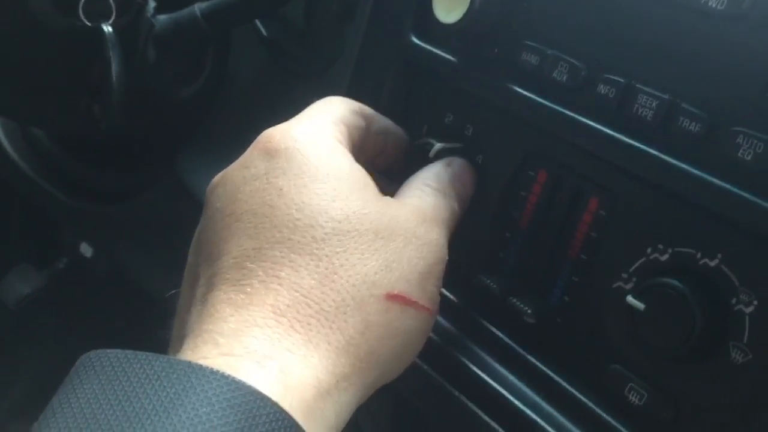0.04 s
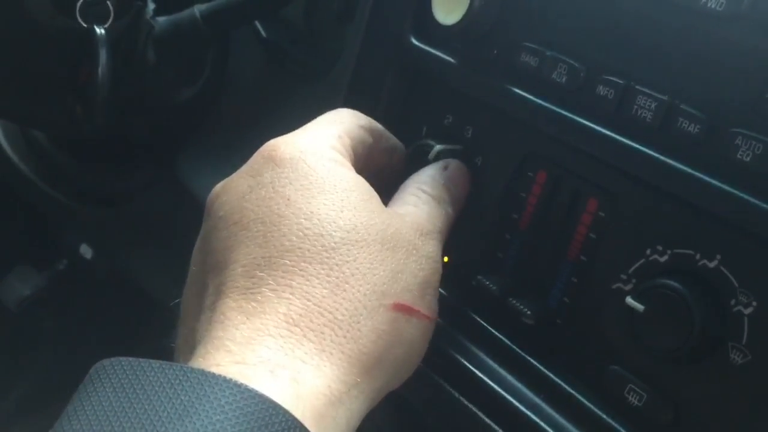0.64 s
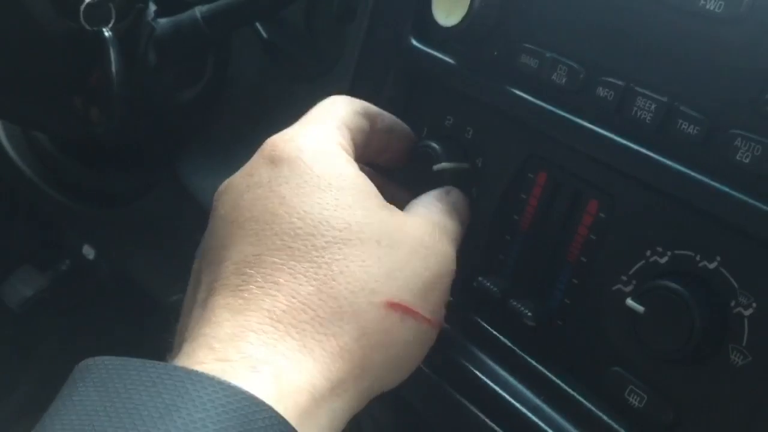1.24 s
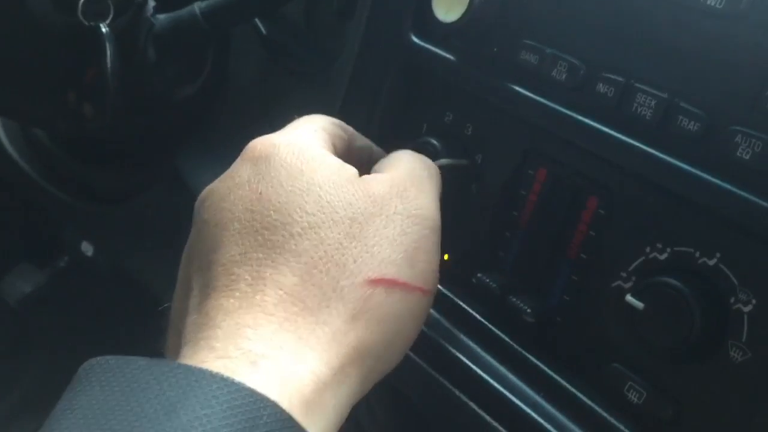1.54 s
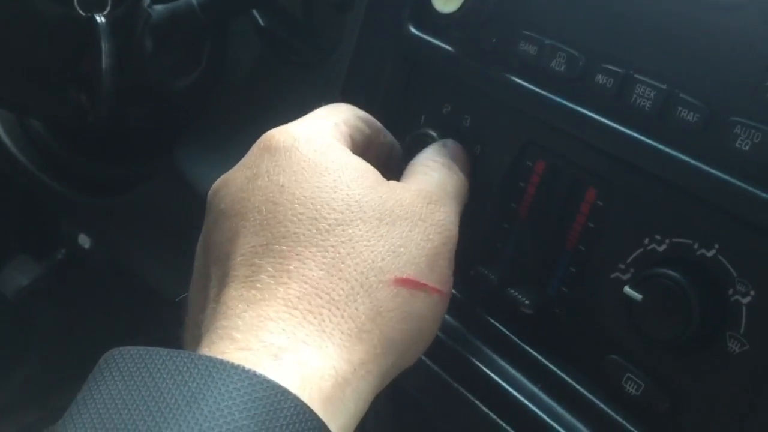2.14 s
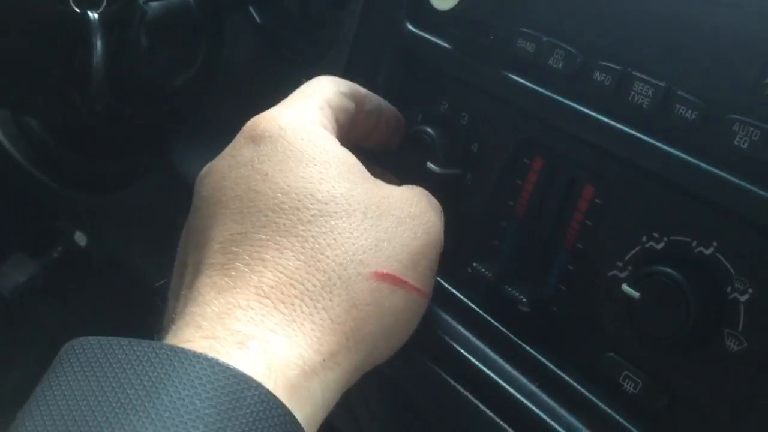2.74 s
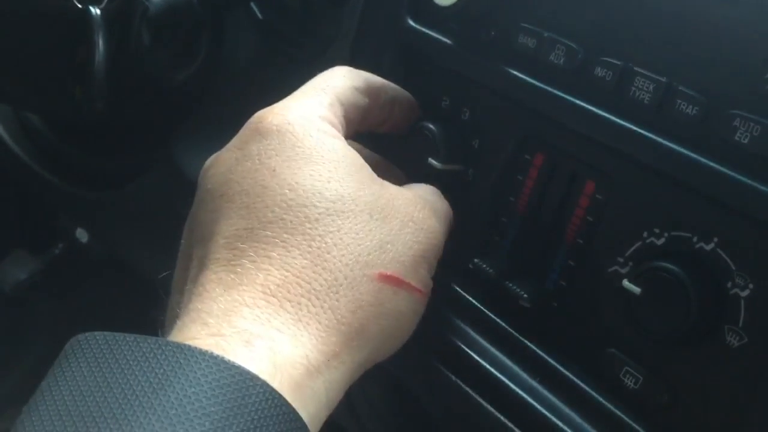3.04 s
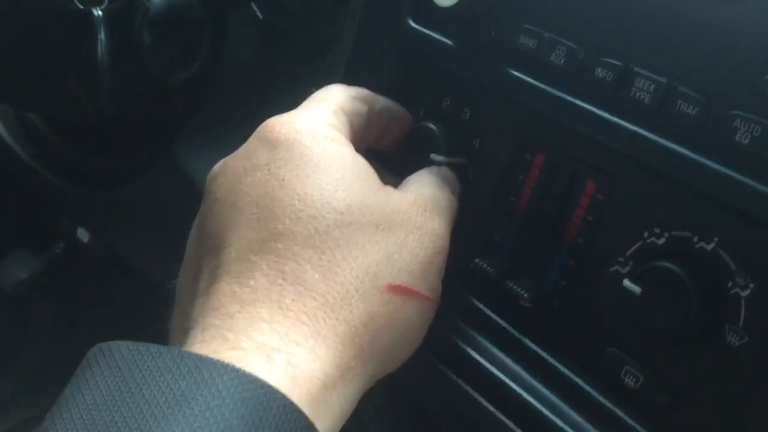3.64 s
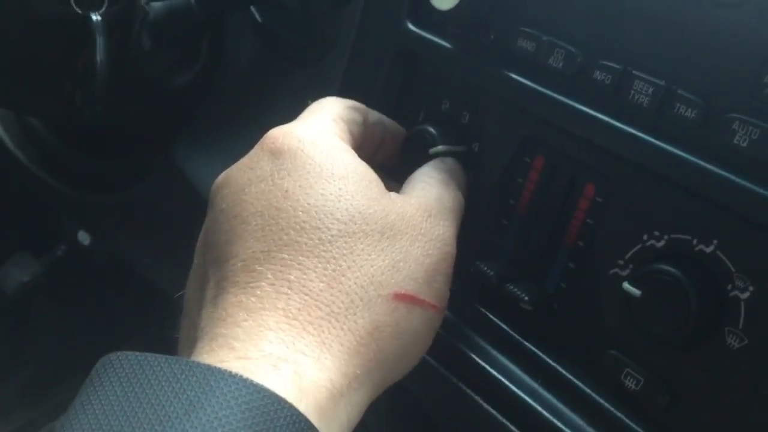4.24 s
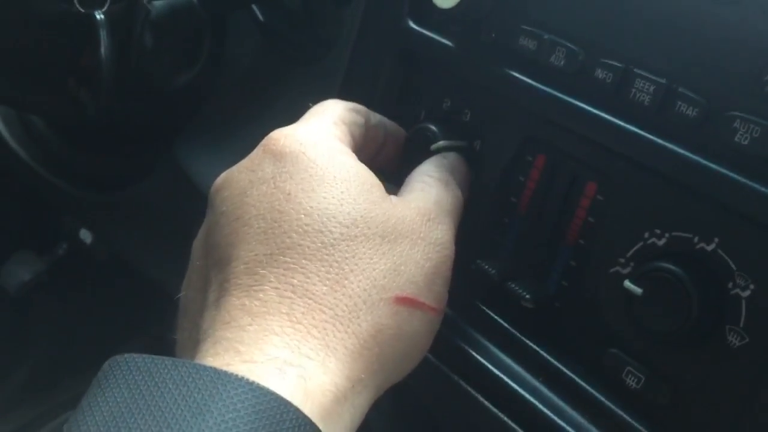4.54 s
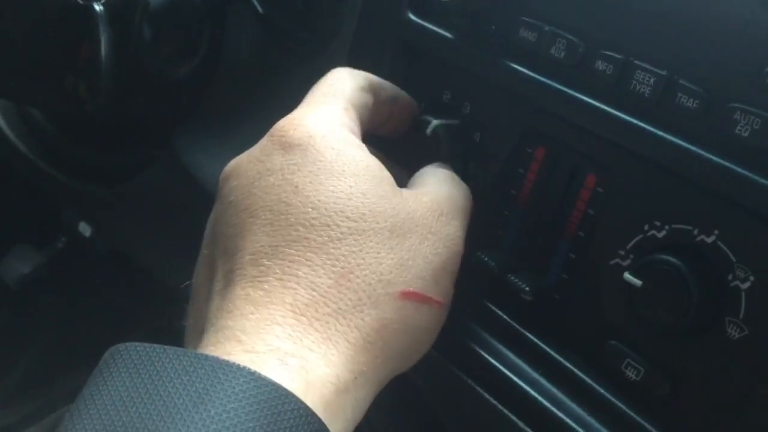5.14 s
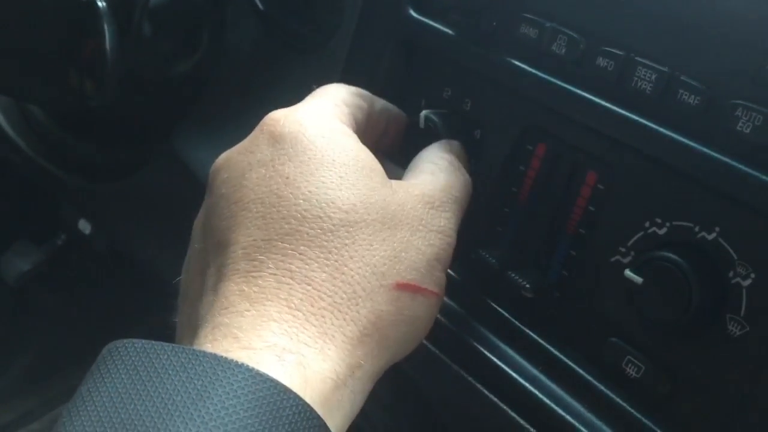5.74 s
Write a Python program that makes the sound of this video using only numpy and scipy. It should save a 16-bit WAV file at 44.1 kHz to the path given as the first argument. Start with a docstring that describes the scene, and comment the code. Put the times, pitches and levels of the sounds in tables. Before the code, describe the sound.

A car heater fan blows, rising to full and dropping back down as a plastic knob clicks through its settings.

```python
"""A car's heater blower, on one microphone at the driver's seat, the dashboard within arm's reach.
A hand clicks the fan knob up to full and back down to its lowest position; the detents snap in plastic.
Each position sets a speed that the wheel runs up or coasts down to. That speed drives the rumble in the
ducts, the hiss at the vents and the motor's hum; the motor whoops while it pulls hard.
The cabin is small and dead, with a low drone under everything."""
import sys
import numpy as np
from scipy import signal
from scipy.fft import rfft, irfft
from scipy.io import wavfile
from scipy.ndimage import uniform_filter1d

SR = 44100
rng = np.random.default_rng(int(sys.argv[2]) if len(sys.argv) > 2 else 0)


def put_to_file(sound):
    """Save the sound as 16-bit audio at rate SR, in the file named by the first command-line argument."""
    columns = np.atleast_2d(sound).T  # one column per channel
    safe = np.clip(columns, -1, 1)
    whole_steps = np.round(safe * 32767)
    wavfile.write(sys.argv[1], SR, whole_steps.astype(np.int16))


N = 259749

FULL_HZ = 50.2  # the shaft rate that counts as speed 1
# how the blower housing passes the motor's sound: (frequency [Hz], gain [dB])
HOUSING_GAIN = [(200, -18), (260, -13), (293, -6), (325, -12), (355, -5), (380, 0), (395, 0), (425, -3),
                (452, 0), (474, -3), (502, -2), (545, -8), (597, -6), (700, -26)]
# the knob drops into a position; on the way up it overshoots to full and slips back:
# (time [s], position, tick level [dB], snap level [dB], snap's treble lift [dB],
#  knock level [dB], knock range [Hz], thump level [dB])
KNOB_MOVES = [(1.112, 4, -42, -36.5, 9, -47, 2220, -44.5), (1.262, 3, -60, -47.5, 9, -59, 1810, -49),
              (2.3217, 4, -47, -34, 1.5, -30.5, 1620, -32.5), (3.767, 3, -55, -36, 6.5, -35.5, 1980, -37.5),
              (4.7434, 2, -59, -38, 9, -40, 1260, -38.5), (5.6444, 1, -56, -34.5, 12, -47.5, 901, -42)]


def undb(db):
    """Decibels to gain."""
    return 10 ** (np.asarray(db) / 20)


def response(points, hz):
    """Gain at hz of a spectrum of (frequency [Hz], level [dB]) points."""
    at, db = np.transpose(points)
    return undb(np.interp(np.log(hz + 1e-9), np.log(at), db))


def bins(size):
    """Frequencies of the spectrum of a sound of this length."""
    return np.arange(size // 2 + 1) * SR / size


def peak(f, hz, width):
    """Squared magnitude of one resonance, 1 at its centre."""
    return abs(1j * f * width / (hz ** 2 - f ** 2 + 1j * f * width)) ** 2


def noise(gain):
    """Noise of rms 1, its spectrum shaped by gain."""
    x = irfft(rfft(rng.standard_normal(N)) * gain, N)
    return x / np.sqrt(np.mean(x ** 2))


def walk(rate):
    """Random levels held 1 / rate s and smoothed twice; spread near 1."""
    hold = max(int(SR / rate), 1)
    steps = np.repeat(rng.standard_normal(N // hold + 1), hold)
    return 1.12 * uniform_filter1d(uniform_filter1d(steps, hold), hold)[:N]


def trail(x, lag):
    """Follow a control with a time constant of lag s."""
    keep = np.exp(-1 / (lag * SR))
    return x[0] + signal.lfilter([1 - keep], [1, -keep], x - x[0])


def split(x, hz):
    """The parts of a sound below and above hz."""
    high = irfft(rfft(x) / (1 + (hz / (bins(N) + 1)) ** 3), N)
    return x - high, high


def causal(gain):
    """The response with this gain that rings only after the blow."""
    cepstrum = irfft(np.log(gain + 1e-9))
    half = len(cepstrum) // 2
    cepstrum[1:half] *= 2
    cepstrum[half + 1:] = 0
    return np.exp(rfft(cepstrum))


def wheel():
    """Shaft rate [Hz] easing to each setting, and pull: the share of speed lacking, negative coasting."""
    # where the shaft settles: {knob position: shaft rate [Hz]}
    settled_hz = {1: 25.6, 2: 32.8, 3: 39.15, 4: 50.15}
    # easing time: straight off the battery in the top position, through a resistor in the others
    direct_turns, resistor_turns = 4.7, 8.2
    start_hz, start_position = 27.9, 2
    t = np.arange(N) / SR
    hz, goal = np.full(N, start_hz), np.zeros(N)
    for start, position, *_ in [(0.00076, start_position)] + list(KNOB_MOVES):
        i, goal_hz = int(start * SR), settled_hz[position]
        lag = (direct_turns if position == max(settled_hz) else resistor_turns) / goal_hz
        hz[i:] = goal_hz + (hz[i] - goal_hz) * np.exp(-t[:N - i] / lag)
        goal[i:] = goal_hz
    return hz, (goal - hz) / FULL_HZ


def duct_rumble(speed):
    """Turbulence behind the dashboard grows as a power of the speed and sounds the ducts' resonances."""
    # rumble at full speed: (frequency [Hz], relative level [dB])
    spectrum = [(22, -25), (38, -19), (50, -12.5), (68, 3), (95, -3.5), (118, 2.5), (155, -7), (195, -6.5),
                (230, -15.5), (275, -15.5), (320, -15.5), (400, -16.5), (520, -21.5), (610, -22),
                (690, -28), (800, -29), (1150, -54), (1800, -99)]
    # duct resonances: (frequency [Hz], width [Hz], relative level [dB])
    modes = [(568, 63, 11), (867, 54, 7.5), (974, 143, 8), (1085, 100, 6), (1339, 51, 0), (1764, 60, -7),
             (2000, 60, -2)]
    f = bins(N)
    # big eddies take a moment to build and to die; smaller ones follow the wheel
    big, small = split(noise(response(spectrum, f)), hz=200)
    eddies = big * trail(speed, lag=0.16) ** 2.41 + small * speed ** 2.45
    rumble = eddies * undb(-29 + .5 * walk(5.39))
    mode_power = sum((undb(db) * peak(f, hz, width)) ** 2 for hz, width, db in modes)
    return rumble + noise(np.sqrt(mode_power)) * speed ** 3.1 * undb(-45.5 + 1.2 * walk(21))


def vent_hiss(speed, pull):
    """Air hisses through the slats; small eddies need fast air, so it brightens as it swells."""
    # hiss at full speed: (frequency [Hz], relative level [dB])
    spectrum = [(710, -40), (1200, -1.5), (1700, 3), (2380, -2.5), (3000, -2), (3360, -4.5), (3950, -2.5),
                (4600, -6), (5020, -12), (6230, -10.5), (7660, -18.7), (9500, -21), (10400, -33.5),
                (11600, -39), (14800, -29.5), (16000, -49)]
    # the slats colour the hiss: (frequency [Hz], width [Hz], lift [dB])
    slat_peaks = [(2280, 70, 1.5), (2680, 70, 2), (3170, 100, 4.5), (3450, 80, 3), (3705, 80, 4.5),
                  (4460, 120, 2), (4770, 90, 2.5)]
    f = bins(N)
    slats = undb(sum(db * peak(f, hz, width) for hz, width, db in slat_peaks))
    coarse, fine = split(noise(response(spectrum, f) * slats), hz=2800)
    push = speed + 0.11 * np.maximum(pull, 0)  # answers the motor's pull at once
    hiss = coarse * push ** 4.17 + fine * (push + 0.062 * np.minimum(pull, 0)) ** 5.14
    return hiss * undb(-46.5 + walk(12))


def shaft_tone(multiple, hz, angle):
    """One multiple of the shaft rate, heard through the housing; faster air makes it flutter more."""
    flutter = undb(2.6 * hz / FULL_HZ * walk(18) - .65)
    tone = np.sqrt(2) * np.sin(multiple * angle + rng.uniform(0, 2 * np.pi))
    return flutter * response(HOUSING_GAIN, multiple * hz) * tone


def motor_hum(hz, angle, pull):
    """The wheel's harmonics and the whine of the armature slots sweep through the housing's resonances."""
    # wheel hum: (multiple of the shaft rate, full-speed level before the housing [dB], power of speed)
    harmonics = [(7, -50, 1), (8, -45.8, 2.1), (9, -45, 2.6), (10, -46.6, 1.9), (11, -55, 2), (13, -56, 1),
                 (15, -41.5, 4)]
    # swell of the armature's whine: (time [s], relative level [dB])
    whine_swell = [(0, -4), (.25, 0), (1.1, 0), (1.35, -6), (1.7, -2), (2.3, -3), (3.8, -1.5), (4.4, .5),
                   (4.9, 0), (5.1, -4), (5.3, -1), (5.72, .5), (5.88, -9)]
    slots, whine_db = 12, -46.3
    speed = hz / FULL_HZ
    hum = sum(shaft_tone(k, hz, angle) * undb(db) * speed ** power for k, db, power in harmonics)
    swell_db = np.interp(np.arange(N) / SR, *np.transpose(whine_swell))
    whine = shaft_tone(slots, hz, angle) * undb(whine_db + swell_db)
    # coasting down from a high speed, the motor draws little current and its tones sink
    load = undb(90 * trail(np.minimum(pull, 0) * speed ** 4, lag=.02))
    return load * (hum + whine)


def motor_surge(hz, angle, pull):
    """A surge of current makes the motor whoop upwards and growl, and its brushes hiss."""
    # torque ripple: (multiple of the shaft rate, level at pull 1 before the housing [dB])
    ripple_orders = [(11, -4), (14, -8)]
    f, current = bins(N), np.maximum(pull, 0)
    growl = noise(peak(f, hz=530, width=230) * np.sqrt(response(HOUSING_GAIN, f))) * undb(-20.5)
    brushes = noise(peak(f, hz=4300, width=4300)) * undb(-40)
    ripple = sum(shaft_tone(k, hz, angle) * undb(db) for k, db in ripple_orders)
    whoop = trail(current, lag=.065) ** 2 * ripple
    return whoop + trail(current, lag=.036) ** 2 * (growl + brushes)


def cabin_drone():
    """A low drone, as of an idling engine, that stays whatever the fan does."""
    return noise(peak(bins(N), hz=81, width=38)) * undb(-43)


def knob_contacts():
    """The spring ticks over the ridge and snaps into the notch; the knob knocks home; the panel thumps."""
    # ticks and rebounds of the knob's play under the fingers; all contacts share these columns:
    # (time [s], level [dB], favoured range [Hz], its lift [dB], its width [octaves], fade [s])
    rattles = [(1.105, -48, 14000, 19, .8, 0.0013), (1.127, -43, 3500, 2, .8, 0.0023),
               (1.251, -63, 13000, 16, .8, .0018), (1.2505, -48.5, 5740, 25, 0.088, 0.00091),
               (2.28, -52, 3800, 9, .8, .0018), (2.2885, -43, 7000, 5, 0.12, 0.00087),
               (2.2895, -52, 3300, 17, .2, .0018), (2.3215, -33, 3600, 10, 0.14, 0.0015),
               (2.3218, -37, 9300, 14, .3, 0.00076), (4.7525, -45, 1920, 19, .5, 0.0012),
               (4.758, -54, 2400, 13, .8, 0.0017), (4.7725, -55, 2508, 14, .8, .0015),
               (5.6405, -46.5, 6410, 14, .15, 0.0021), (5.6457, -48.5, 9000, 15, .3, 0.00045),
               (5.6515, -47, 2900, 11, 0.92, 0.0015), (5.749, -61.5, 7000, 3, .8, 0.0015)]
    contacts = []
    for start, _, tick_db, snap_db, lift_db, knock_db, knock_hz, thump_db in KNOB_MOVES:
        tick = (start - .0055, tick_db, 7400, 12, .8, .0018)
        snap = (start, snap_db, 3700, lift_db, .8, .002)
        knock = (start + .00099, knock_db, knock_hz, 18, .35, .0028)
        thump = (start + .005, thump_db, 650, 10.5, .8, .0061)
        contacts += [tick, snap, knock, thump]
    return contacts + list(rattles)


def knob_clicks():
    """Each contact is a brief chatter that cracks and rings the plastic and scatters off the dashboard."""
    # modes of knob and panel, damped by the fingers: (frequency [Hz], width [Hz], relative level [dB])
    modes = [(490, 90, 18), (610, 90, 8.5), (830, 90, 7), (985, 110, 9.5), (1160, 110, 7.5),
             (1610, 70, 8.5), (1735, 90, 10), (1880, 80, 9), (2190, 80, 12), (2360, 70, 5.5), (2530, 70, 5),
             (2690, 70, 5), (3000, 70, 10.5), (3150, 150, 14), (3380, 170, 11.5), (3610, 150, 11.5),
             (4100, 260, 4), (4430, 240, 9.5), (5820, 220, 1.5), (6520, 300, 1.5), (8060, 160, -.5),
             (9000, 160, -1), (9750, 200, 0), (12600, 600, -12), (14750, 500, -7)]
    # the crack of plastic on plastic: (frequency [Hz], relative level [dB])
    crack = [(150, -23), (520, 5), (850, 8.5), (1400, 4.5), (2050, 0.5), (2800, 6.5), (3900, -2.5),
             (4650, 2), (4920, -8), (5200, 0.5), (5900, -3.5), (6900, -2.5), (7800, -4.5), (9700, -10),
             (11400, -24), (13000, -16), (15500, -14)]
    rise_s, scatter_db, scatter_fade_s = .0008, -23.5, .0095
    size = 8192
    t, f = np.arange(size) / SR, bins(size)
    ring_power = sum((undb(db) * peak(f, hz, width)) ** 2 for hz, width, db in modes)
    plastic = np.sqrt(response(crack, f) ** 2 + ring_power)
    upholstery = causal(1 / np.sqrt(1 + (f / 4800) ** 4))  # seats and trim soak up scattered treble
    rise = 1 - np.exp(-t / rise_s)
    out = np.zeros(N + size)
    for start, db, centre_hz, lift_db, octaves, fade in knob_contacts():
        chatter, scatter = rng.standard_normal((2, size)) * rise
        tail = rfft(scatter * undb(scatter_db) * np.exp(-t / scatter_fade_s)) * upholstery
        blow = rfft(chatter * np.exp(-t / fade)) + tail
        # the blow feeds all modes evenly, but a harder contact favours a higher range
        even = 1 / np.sqrt(uniform_filter1d(abs(blow) ** 2, size=51))
        favoured = undb(lift_db * np.exp(-(np.log2((f + 1) / centre_hz) / octaves) ** 2))
        click = irfft(blow * causal(even * plastic * favoured), size)
        rms = np.sqrt(np.sum(click ** 2) / (0.013 * SR))  # its energy spread over 13 ms
        i = int(start * SR)
        out[i:i + size] += undb(db) * click / rms
    return out[:N]


def scene():
    """Air, motor, drone and knob as they reach the driver's seat, in mono."""
    hz, pull = wheel()
    speed = hz / FULL_HZ
    air = duct_rumble(speed) + vent_hiss(speed, pull)
    angle = 2 * np.pi * np.cumsum(hz * (1 + .0011 * walk(16))) / SR  # the pitch wavers slightly
    motor = motor_hum(hz, angle, pull) + motor_surge(hz, angle, pull)
    return (air + motor + knob_clicks() + cabin_drone())[None]


def record(dry):
    """The microphone adds its own faint hiss, and the top is cut."""
    hiss_db, top_hz = -76, 15850
    wet = dry + undb(hiss_db) * rng.standard_normal(dry.shape)
    return signal.sosfilt(signal.ellip(10, .2, 70, top_hz, fs=SR, output="sos"), wet)


dry = scene()
out = record(dry)
put_to_file(out)
```